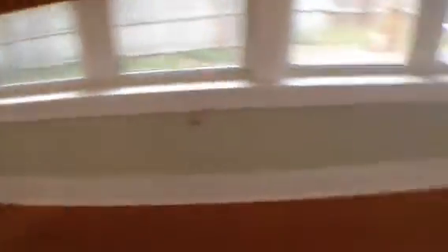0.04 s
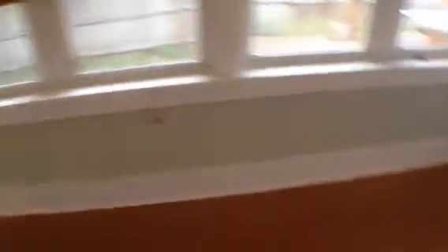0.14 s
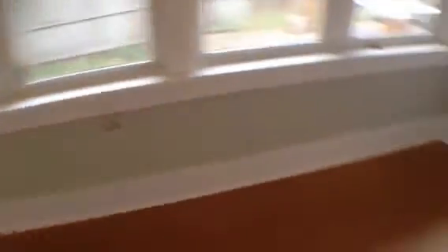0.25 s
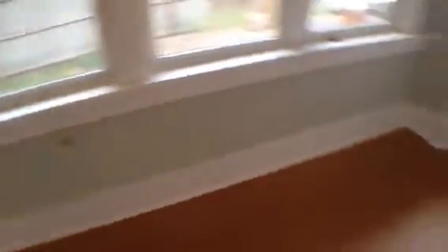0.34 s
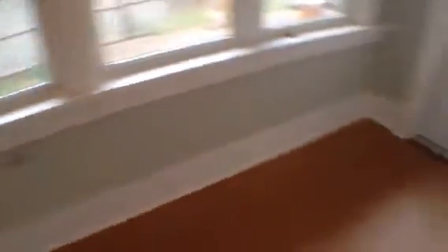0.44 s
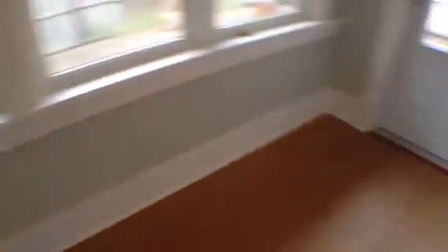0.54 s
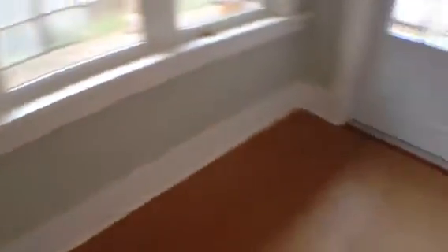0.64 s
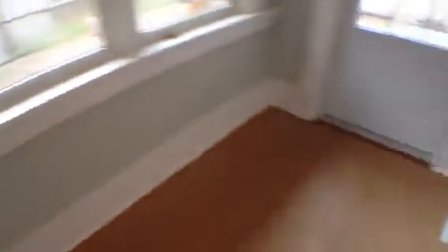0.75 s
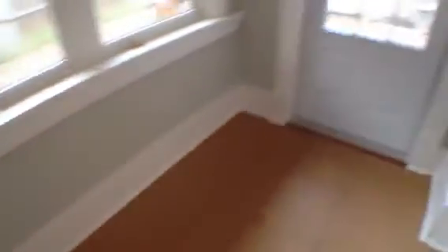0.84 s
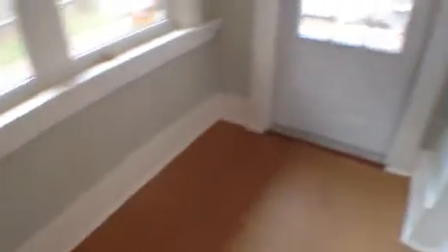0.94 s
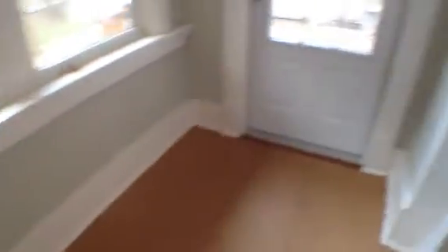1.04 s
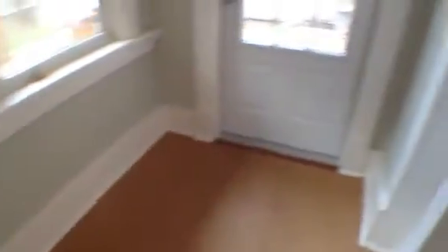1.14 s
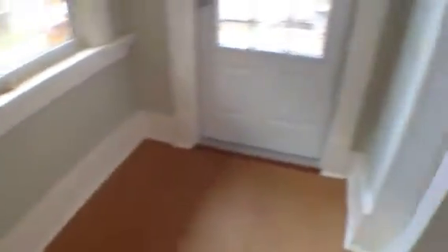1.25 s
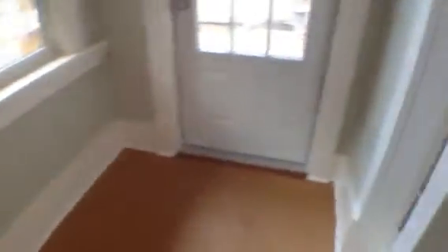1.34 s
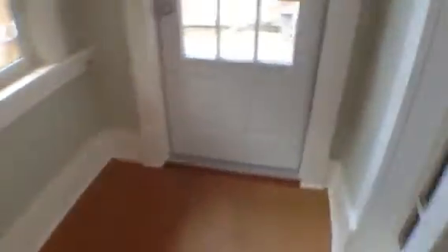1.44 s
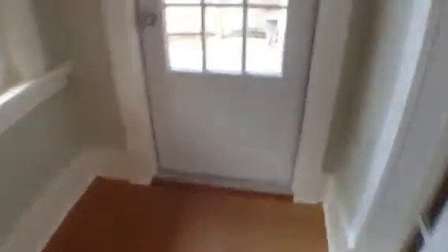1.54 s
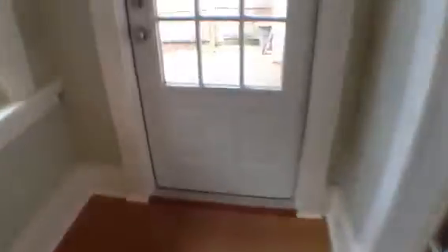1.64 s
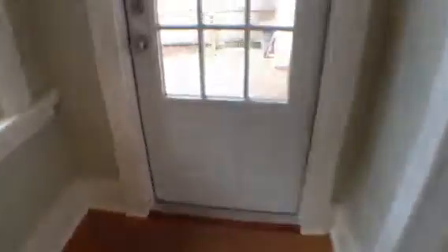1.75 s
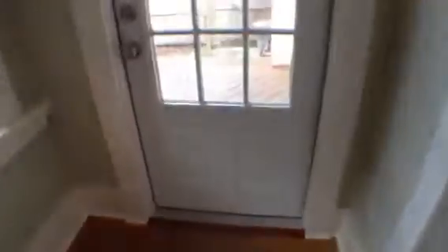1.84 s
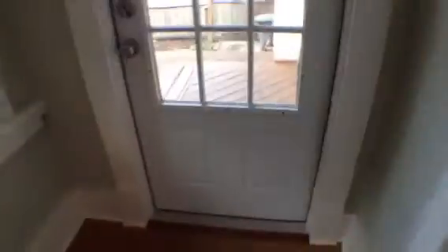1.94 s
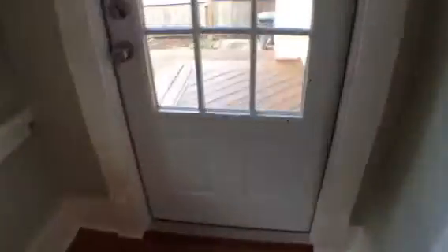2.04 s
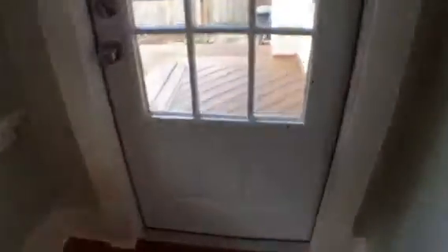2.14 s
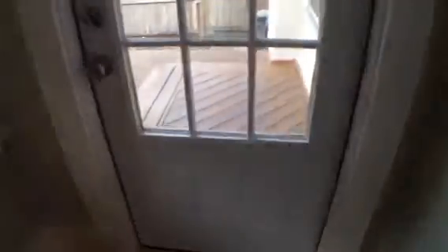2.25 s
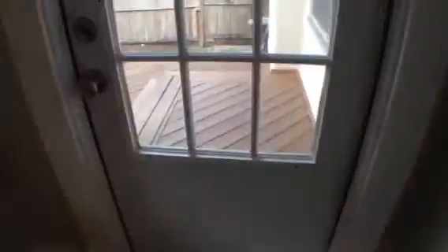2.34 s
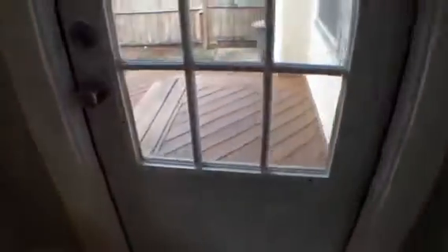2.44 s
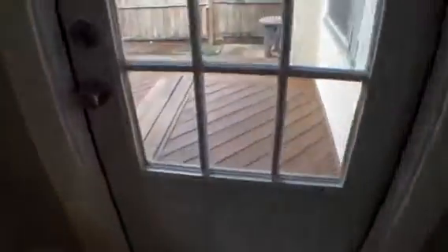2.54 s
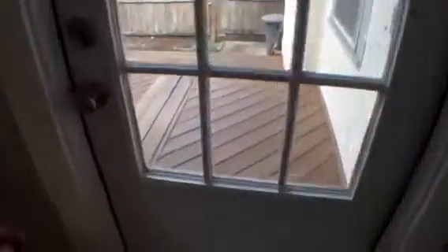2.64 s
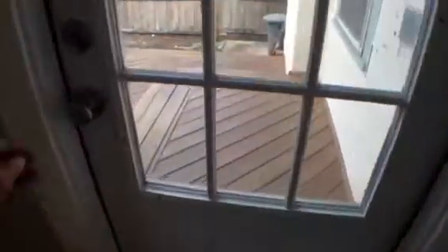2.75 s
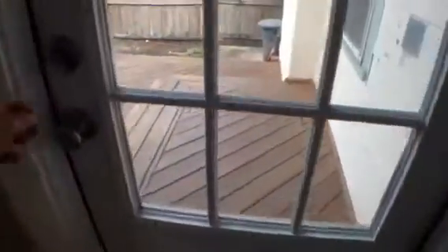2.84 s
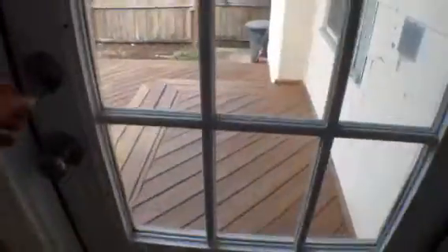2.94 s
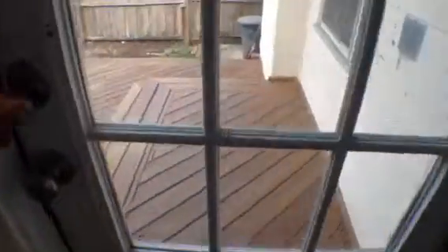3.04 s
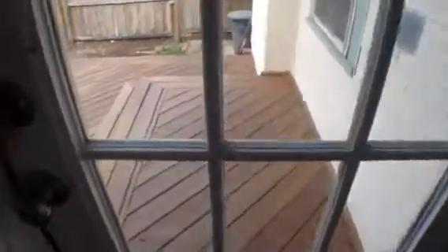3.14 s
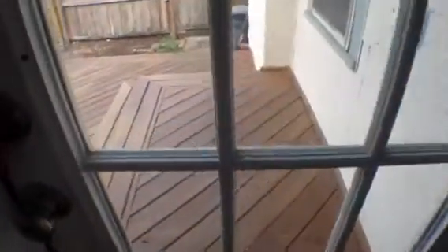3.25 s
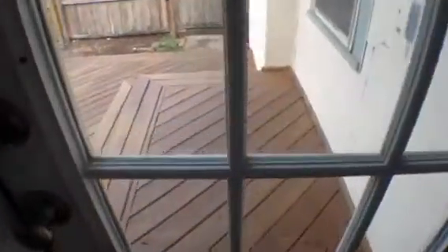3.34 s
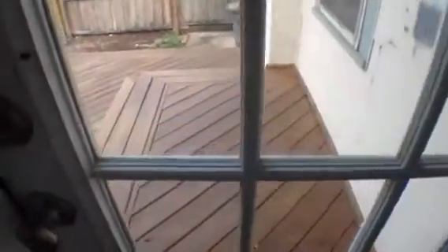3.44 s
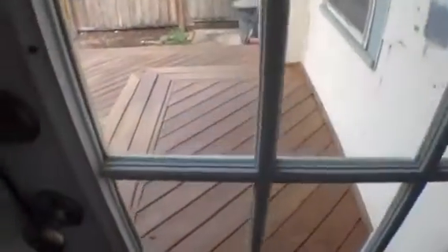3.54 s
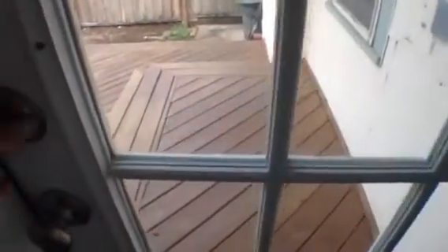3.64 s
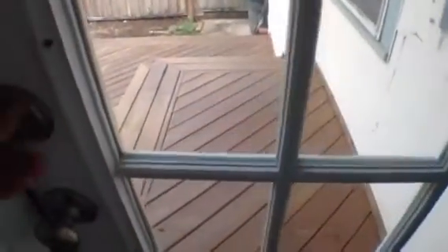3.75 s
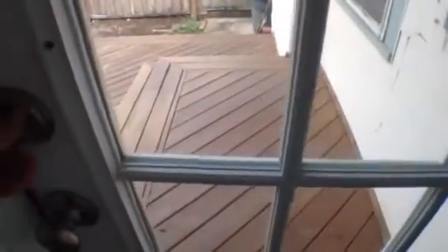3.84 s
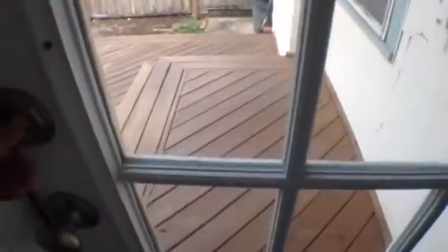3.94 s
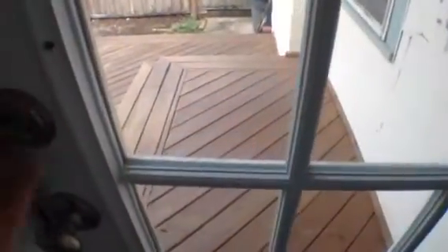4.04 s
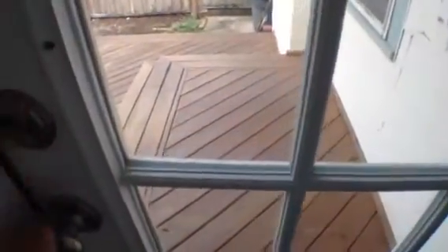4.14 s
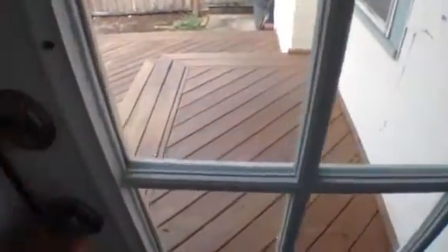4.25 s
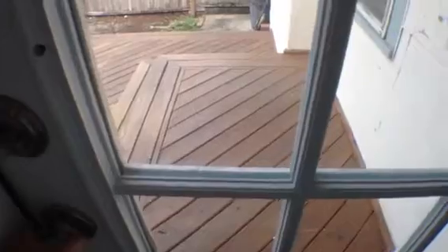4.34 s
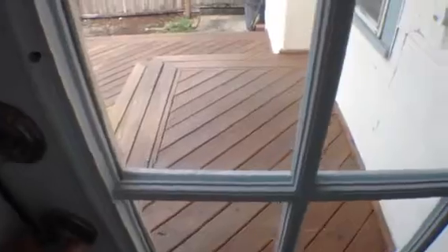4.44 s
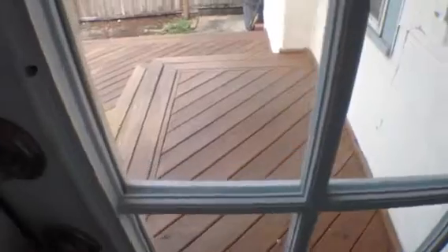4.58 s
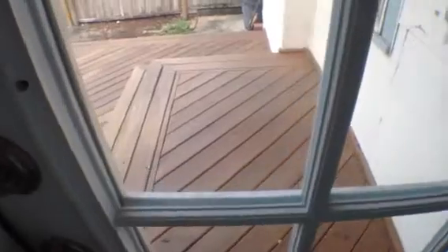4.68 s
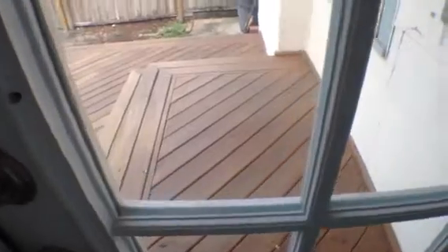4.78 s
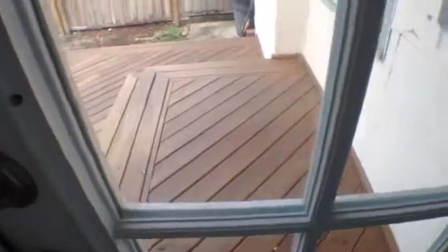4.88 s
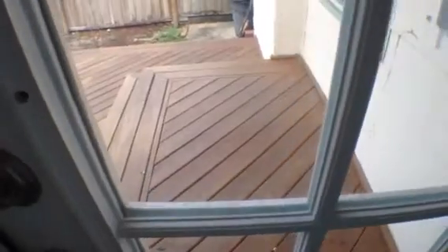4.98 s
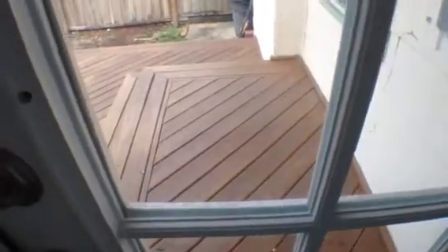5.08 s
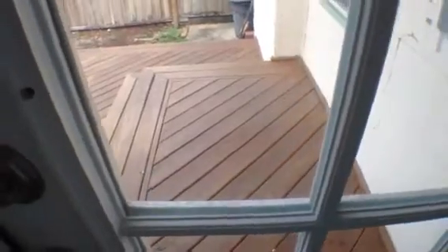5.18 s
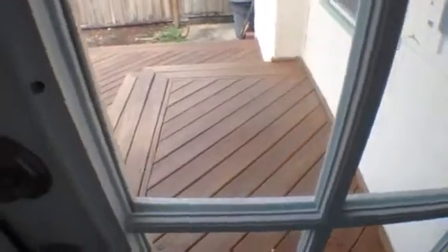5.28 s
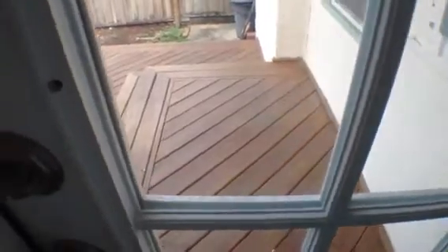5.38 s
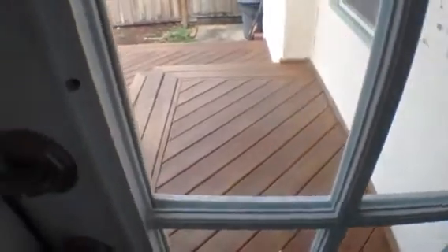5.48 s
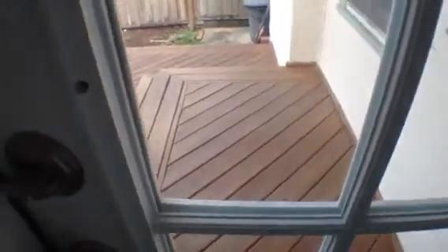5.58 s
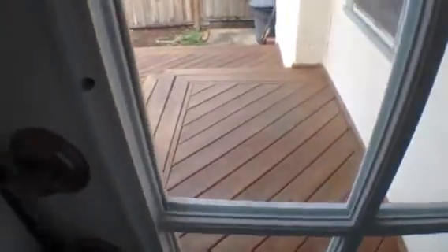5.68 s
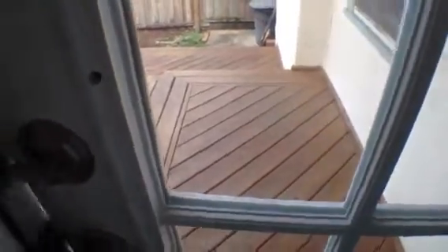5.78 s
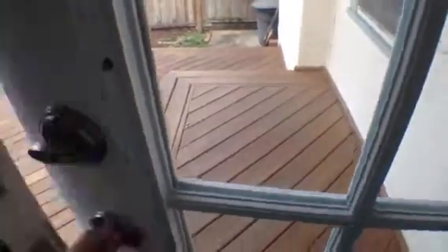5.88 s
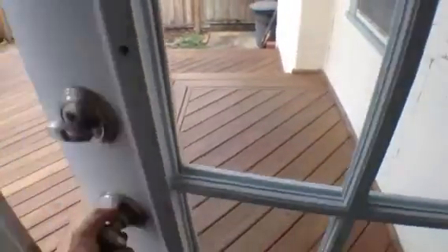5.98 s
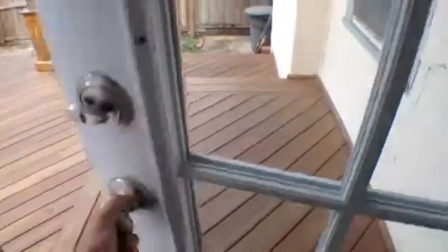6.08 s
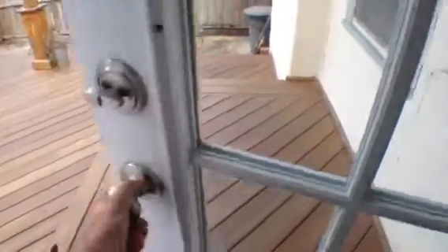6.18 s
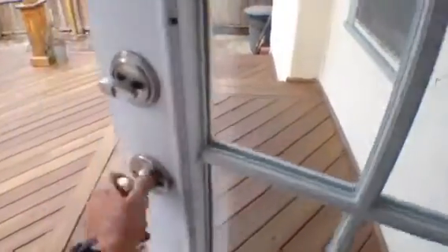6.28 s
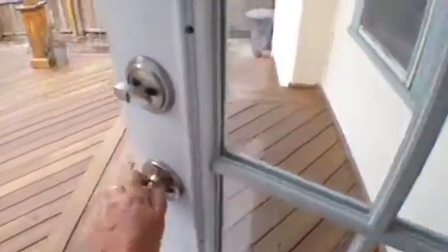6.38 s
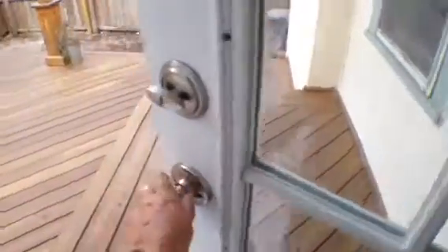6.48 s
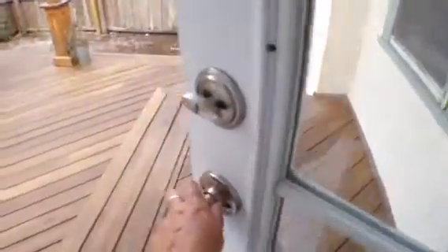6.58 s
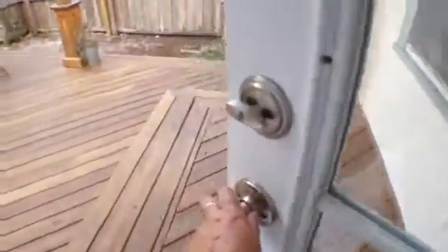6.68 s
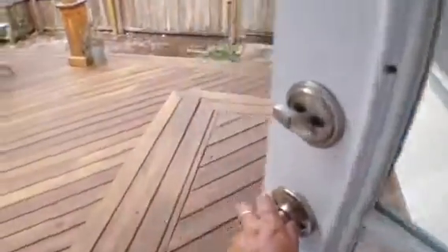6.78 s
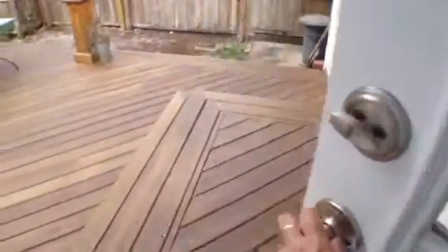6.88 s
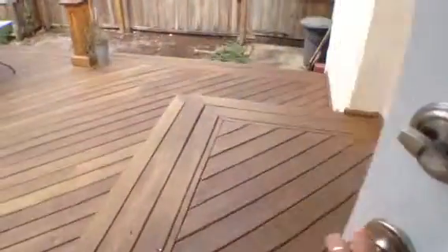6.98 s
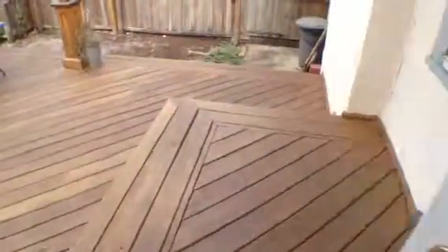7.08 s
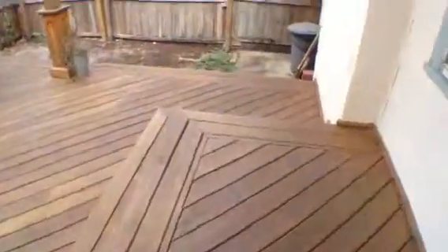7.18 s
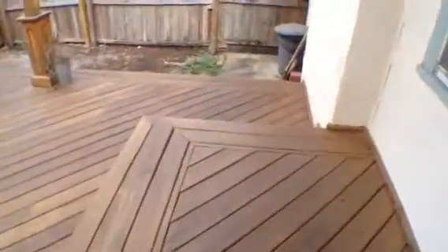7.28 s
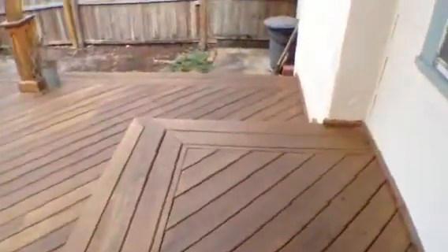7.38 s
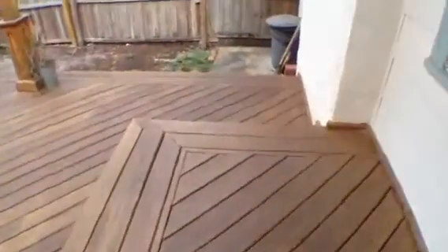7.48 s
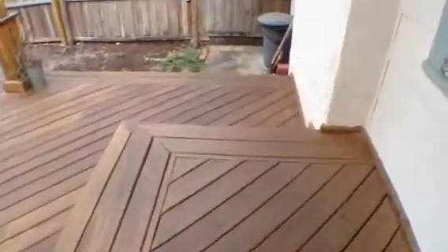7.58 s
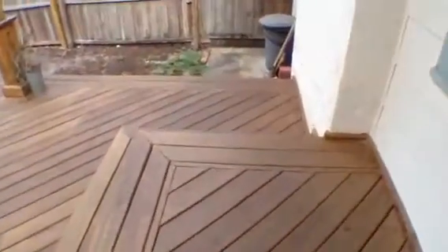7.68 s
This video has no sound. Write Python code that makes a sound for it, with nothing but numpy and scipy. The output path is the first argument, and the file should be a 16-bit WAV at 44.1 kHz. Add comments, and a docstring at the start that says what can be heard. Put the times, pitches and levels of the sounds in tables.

```python
"""In a bare sunroom, someone walks over a wooden floor, turns back a deadbolt, works the door knob
and pulls a glazed door open until it bumps its stop. Shoes rasp and knock on the boards. Each blow
in the lock rings its metal and the door, and sliding parts grind as they stick and slip. The hard
room echoes, and a steady background noise grows as the opening lets in the outdoor air."""
import sys
import numpy as np
from scipy import signal
from scipy.fft import rfft, irfft
from scipy.io import wavfile
from scipy.ndimage import uniform_filter1d

SR = 44100
rng = np.random.default_rng(int(sys.argv[2]) if len(sys.argv) > 2 else 0)


def waveform_to_disk(signal):
    """Save audio, clipped to [-1, 1], as 16-bit WAV at the path in sys.argv[1]."""
    frames = np.transpose(np.atleast_2d(signal))
    scaled = np.clip(frames, -1, 1) * 32767
    samples = np.round(scaled).astype(np.int16)
    wavfile.write(sys.argv[1], SR, samples)


N = 340452

# A "tilt" makes a sound brighter (above 0) or duller. "Contact" is how slowly a hit's chatter fades.
# Steps and scuffs: (time [s], sole level [dB], boards vs sole [dB], joists vs sole [dB],
# contact [s], sole tilt [dB/octave])
FOOTSTEPS = [(0.041, -51, -7, -11, 0.02, -1), (0.4193, -44, -8.5, -7, 0.026, 6),
             (0.5374, -45, -19, -17, 0.019, 0), (0.7997, -51.5, -14, -31, 0.055, 5),
             (0.8992, -39.5, -1.5, -7, 0.0071, 0.5), (1.459, -52, -2, 5.5, 0.048, -4.5),
             (1.6646, -48.5, -6.5, -25, 0.027, -3.5), (1.7569, -35.5, -13, -28, 0.0043, 6.5),
             (1.7744, -50, 6.5, 0, 0.0056, 14), (1.925, -45.5, -25, -9.5, 0.0078, 2),
             (2.1182, -58, 0, 4.5, 0.036, 1), (2.163, -46.5, -2.5, -29, 0.0097, 5),
             (2.246, -49, -3.5, -5, 0.013, -3), (2.3949, -37.5, 2.5, -1.5, 0.0046, -8),
             (2.4151, -56, 10, -13, 0.009, -31), (2.7722, -55.5, -17, 7, 0.013, 5),
             (2.8096, -31.5, -17.5, -36, 0.0067, 11), (7.5346, -42.5, -1.5, -11, 0.0046, -4),
             (7.5615, -53, -28, -12, 0.036, 10)]
# Metal parts and weather strip sliding: (start [s], end [s], grind at start [dB], grind at end [dB],
# hiss vs grind [dB], rumble vs grind [dB], rumble centre [Hz])
RUB_STROKES = [(3.062, 3.192, -61, -56, 3.1, -17, 300), (3.169, 3.267, -54.5, -63, 2, 8, 372),
               (3.24, 3.317, -54.5, -47, 0.5, -4.5, 338), (3.33, 3.472, -51, -60.5, -6, 1, 333),
               (3.511, 3.653, -44, -79, -8, .3, 400), (4.19, 4.237, -72, -70, 3, 16, 255),
               (4.285, 4.442, -54.5, -78.5, -20, 23.5, 169), (4.5, 4.65, -68, -68.5, -24, 17, 233),
               (5.06, 5.138, -79, -41.5, -11, 3, 263), (5.12, 5.298, -53.5, -78, -23, 11.5, 263),
               (5.5, 5.635, -53, -60, -9, 6, 273), (5.629, 5.669, -27.5, -44, -4.5, 7, 205.6),
               (5.66, 5.798, -45, -60, -12, 9.5, 220), (5.99, 6.095, -65, -54.5, -15, 7.5, 280),
               (6.12, 6.26, -57.5, -58.5, -0.5, 3.5, 250), (6.26, 6.344, -55, -49, -4, -6, 250),
               (6.38, 6.478, -50.5, -58.5, -6, -2.5, 300), (6.485, 6.643, -47.5, -72, -9, 1, 280),
               (7.128, 7.197, -53, -41, -6, 12, 203), (7.19, 7.283, -38.5, -70.5, 0, 10.5, 287),
               (7.202, 7.35, -57, -76, 4, 18, 284)]
# Blows in the lock: (time [s], case level [dB], small parts vs case [dB], stile vs case [dB],
# panel vs case [dB], contact [s], case tilt [dB/octave])
LOCK_BLOWS = [(3.2664, -58, 20, 7, -11, 0.0058, -2), (3.3095, -26.5, -14, -13.5, -32, 0.015, 4),
              (3.3272, -33.5, -11, 1, -10, 0.0037, 1.5), (3.478, -24, -4.5, -21.5, -36, 0.011, 5),
              (3.5034, -25, 1.5, -10.5, -15, 0.002, 10), (3.5658, -39, -14, -9, -8, 0.0053, 4),
              (3.6856, -44.5, -10, -19, -23, 0.0068, 4), (3.7993, -33.5, -10.5, -4.5, -3, 0.017, -0.5),
              (4.2452, -40.5, -0.5, -38, -10, 0.0095, 3), (4.2678, -41, -8, -4, -1.5, 0.021, 8),
              (4.2898, -31.5, 2, 1, -2, 0.0075, 7.5), (4.3196, -52, -15, 14, 6, 0.0031, -2),
              (4.3526, -60, -13, 8, 1, 0.0066, 4), (4.4895, -30.5, -1, -23, -9, 0.0034, 9.5),
              (4.5523, -38.5, -21, -3, -18, 0.005, 5), (4.5877, -36, -2, -7, -11, 0.0071, -1),
              (5.004, -34.5, 4.5, -24, -30, 0.0043, 6.5), (5.0591, -44.5, 0, -4, -5, 0.0059, 6),
              (5.1286, -35.5, -14, .5, -5, 0.0031, 11), (5.1395, -39.5, 2, -7, -6, 0.0017, -17),
              (5.2862, -46.5, -8, -11, 5, 0.012, 1), (5.302, -48.5, 2, 1.5, 7.5, 0.0037, 4),
              (5.4289, -38.5, -3.5, 7.5, 2.5, 0.0069, -10), (5.442, -36, -10, -2, -3, 0.022, -2),
              (5.4778, -22.5, -9.5, -8, -10, 0.0083, 4), (5.4903, -18.5, -24, -32, -11, 0.0076, -2),
              (5.6341, -22.5, 0.5, -9.5, 3, 0.0063, -2), (5.648, -17.5, -20, -5, -10, 0.0064, -5),
              (5.6643, -27, 6.5, -1, 9, 0.0019, -13), (6.0113, -53, 7, 1.3, 11, .0035, .3),
              (6.0613, -48.5, 5, 7, -12, 0.0018, 4), (6.098, -21.5, -5, -11.5, -17, 0.0055, 9),
              (6.2656, -28, -12, -15, -27, 0.0027, -2.3), (6.348, -28.5, -1.5, 4, -0.5, 0.0053, -3.5),
              (6.3738, -35.5, -3, 0, 0, 0.0042, -2), (6.447, -35, -19, -9, -14, 0.0028, 3.7),
              (6.4876, -32.5, -8, -9, -7.5, 0.007, -2), (7.0181, -52, -8, 12, 4, 0.015, .3),
              (7.057, -37, 2, -17, -16, 0.025, 5), (7.1249, -28.5, -15, 10.5, 2.5, 0.0056, -4),
              (7.142, -45.5, -9, 9, 23.5, .004, -5), (7.1738, -25, -3, -19, -3, 0.0042, -6.5),
              (7.1976, -22, -4, -19, -17, .0034, 0), (7.2109, -31.5, -9, -18, 10.5, .0022, 2)]
# Loose parts clicking on their own: (time [s], level [dB], tilt [dB/octave])
LOOSE_CLICKS = [(3.7653, -41.5, 9), (3.8484, -34, 17.5), (3.859, -37, 16), (4.1632, -37, 8),
                (4.6335, -29, 12), (4.6436, -34.5, 15), (4.951, -43, 12), (4.967, -46, 11),
                (5.085, -39, 6.3), (5.147, -29.5, 12), (5.2325, -38, 0), (5.3775, -29.5, 20),
                (5.7931, -37, -7), (6.198, -33, .3), (6.321, -34.5, -9)]
# Pings of the spindle, the rod through the knob: (time [s], level [dB])
SPINDLE_PINGS = [(3.477, -51), (4.2444, -44), (4.5885, -42), (5.4285, -55), (5.442, -53), (5.4771, -30),
                 (5.635, -32), (6.0602, -50)]

# Modes, the pitches at which each object rings: (pitch [Hz], width [Hz], level [dB])
SOLE_MODES = [(4500, 880, 7.5), (6700, 1700, -7), (7440, 3600, 9.5), (9500, 18000, 3.5), (11370, 1800, 3.5),
              (15140, 8100, -4)]
BOARD_MODES = [(1070, 550, -17.5), (1430, 1100, 1), (1730, 1300, 4), (2560, 330, 2.5), (3000, 830, -3.5)]
JOIST_MODES = [(260, 24, 1), (290, 85, 0), (362, 99, 5), (460, 200, 7), (580, 100, -1), (664, 280, 1),
               (810, 320, -15)]  # the beams under the floorboards
LOCK_CASE_MODES = [(1090, 280, -3), (1340, 280, 0), (1540, 280, 1), (1800, 320, 0), (2180, 350, 0),
                   (2600, 420, -3), (3050, 480, -4), (3550, 520, -5), (4150, 500, -5), (4715, 380, -4),
                   (5100, 400, -11)]
SMALL_PART_MODES = [(5900, 1000, -2), (6900, 900, 0), (7800, 1000, -1), (8800, 1100, -2), (10000, 900, 0),
                    (11200, 900, 0), (12500, 1300, -1), (14000, 1500, -1), (15200, 1200, -2)]
PANEL_MODES = [(130, 32, -14), (162, 54, -1), (191.3, 28, -0.5), (227, 75, 0), (297.3, 58, 1),
               (358, 33, -4), (372, 26, -3)]  # the whole swinging door
STILE_MODES = [(442, 41, -2), (528, 37, 0.5), (621, 120, -2), (648, 100, -5.5), (756, 70, -1),
               (884, 170, -9)]  # the door's upright edge, which holds the lock
SPINDLE_MODES = [(4700, 82, 0)]

# Tone of the background air and of the rubbing hiss: (frequency [Hz], level [dB])
AIR_SPECTRUM = [(18, -55), (30, -5), (58, 5), (74, -36), (92, -38), (118, -7), (242, -5), (331, -5.5),
                (529, -14), (939, -16), (1760, -21.5), (2880, -23), (5000, -26.5), (9000, -30.5),
                (15300, -31)]
HISS_SPECTRUM = [(3500, -22.5), (5500, 6), (8000, 5), (11000, 2.5), (15000, 3)]
# How long the room echoes: (frequency [Hz], time to fade by 60 dB [s])
ECHO_TIMES = [(120, 0.6), (330, 0.46), (870, 0.64), (2300, 0.6), (6060, 0.44)]


def gain_of(db):
    return 10 ** (np.asarray(db) / 20)


def unit_rms(x):
    return x / np.sqrt(np.mean(x ** 2) + 1e-20)


def value_at(points, hz):
    f, value = np.transpose(points)
    return np.interp(np.log(hz + 1), np.log(f + 1), value)


def add(mix, start_s, sound):
    part = mix[round(start_s * SR):][:len(sound)]
    part += sound[:len(part)]


def coloured(x, spectrum):
    """Filters x by a spectrum and sets its average strength (rms) to 1."""
    gains = gain_of(value_at(spectrum, np.fft.rfftfreq(len(x), 1 / SR)))
    return unit_rms(irfft(rfft(x) * gains, len(x)))


def chatter(contact_s):
    """The force of one hit: a sharp first touch, then tiny bounces that die away."""
    t = np.arange(8192) / SR
    contact_s = np.clip(contact_s, .0005, .04)
    bounces = np.exp(-t / contact_s) * (1 - np.exp(-t / (0.034 * contact_s)))
    touch = 2.6 * np.exp(-t / 0.0002)
    size = (bounces + touch) * abs(rng.standard_normal(len(t)))
    force = size * rng.choice([-1., 1.], len(t))
    for _ in range(4):  # choose the signs so that no pitch stands out
        spectrum = rfft(force)
        force = size * np.sign(irfft(spectrum / abs(spectrum)))
    return np.pad(force, (0, 4096))


def ring(force, modes, rise_s, tilt_db=0.):
    """An object rings at its modes, a little differently depending on where the force lands."""
    hz, width, db = np.transpose(modes)[:, :, None]
    luck = rng.standard_normal((len(modes), 2))
    share_db = db + tilt_db * np.log2(hz / np.median(hz)) + 1.5 * luck[:, :1]
    hz = hz * (1 + .015 * luck[:, 1:])
    f = np.fft.rfftfreq(8192, 1 / SR) + 1
    distance = (f ** 2 - hz ** 2) / (f * width)
    power = (gain_of(share_db) ** 2 / (1 + distance ** 2) ** 1.6).sum(0)
    cepstrum = irfft(np.log(power + 1e-9 * power.max()) / 2)
    cepstrum[1:4096] *= 2  # this fold puts all the ringing after the hit
    cepstrum[4097:] = 0
    ringing = irfft(np.exp(rfft(cepstrum)))[:4096]
    fade_in = 1 - np.exp(-(np.arange(4096) + 1) / SR / rise_s)
    return signal.fftconvolve(force, ringing * fade_in)[:len(force)]


def strike(contact_s, objects):
    """One hit rings several objects, each (modes, peak level [dB], rise [s], tilt [dB/octave])."""
    force, out = chatter(contact_s), 0
    for modes, db, rise_s, tilt_db in objects:
        sound = ring(force, modes, rise_s, tilt_db)
        out = out + gain_of(db) * sound / abs(sound).max()
    return out


def background_air():
    """House rumble and hiss drift in patches, growing louder and brighter as the door opens."""
    frames, hz = N // 256 + 5, np.fft.rfftfreq(1024, 1 / SR)
    real, imag, patches = rng.standard_normal((frames, 513, 3)).T
    drift_db = 1.2 * unit_rms(uniform_filter1d(uniform_filter1d(patches, 10, 0), 12, 1))
    t, opening_s = np.arange(frames) * 256 / SR, (5.7, 6.4)
    level_db = np.interp(t, opening_s, (-59.5, -54))
    hiss_db = np.interp(t, opening_s, (0, 3.4))
    treble_share = np.clip(np.log2((hz + 1) / 900) / 2.36, 0, 1)[:, None]
    colour = gain_of(value_at(AIR_SPECTRUM, hz))[:, None]
    colour /= np.linalg.norm(colour[(hz > 100) & (hz < 1000)])
    bands = (real + 1j * imag) * colour * gain_of(level_db + treble_share * hiss_db + drift_db)
    noise = signal.istft(bands, nperseg=1024, noverlap=768)[1][:N]
    bass_dip = signal.butter(3, [66., 98.], "band", fs=SR, output="sos")
    return noise - 0.92 * signal.sosfiltfilt(bass_dip, noise)


def footsteps():
    """Soles rasp and slap; a shorter hit knocks the boards and thuds in the beams below."""
    out = np.zeros(N)
    for s, db, board_db, joist_db, contact_s, tilt_db in FOOTSTEPS:
        add(out, s, strike(contact_s, [(SOLE_MODES, db, .00005, tilt_db)]))
        floor = [(BOARD_MODES, db + board_db, .0002, 0), (JOIST_MODES, db + joist_db, .001, 0)]
        add(out, s, strike(0.25 * contact_s, floor))
    return out


def room_echo(sound):
    """Hard walls send back echoes, each pitch range fading at its own speed; three tails take turns."""
    out = np.zeros(N)
    for k in range(3):
        echoes = np.zeros(SR)
        slots = np.arange(180, SR - 20, 20)
        echoes[slots + rng.integers(0, 20, len(slots))] = rng.choice([-1., 1.], len(slots))
        hz, t, bands = signal.stft(echoes, SR, nperseg=256)
        fade = gain_of(-60 * t / value_at(ECHO_TIMES, hz)[:, None])
        tail = signal.istft(bands * fade, SR, nperseg=256)[1]
        turn = np.sqrt(2 / 3) * np.cos(np.pi * (np.arange(N) / SR * 3.1 + k / 3))
        out += signal.fftconvolve(sound * turn, tail / np.linalg.norm(tail))[:N]
    return out


def rubbing():
    """Sliding parts stick and slip: the uneven jerks grind in the lock, hiss and shake the door."""
    out = np.zeros(N)
    for start, end, start_db, end_db, hiss_db, rumble_db, hz in RUB_STROKES:
        n = len(np.arange(start, end, 1 / SR))
        jerks = gain_of(2.1 * unit_rms(uniform_filter1d(rng.standard_normal(n), 150)))
        on_lock, on_surface, on_door = jerks * rng.standard_normal((3, n))
        grind = unit_rms(ring(on_lock, LOCK_CASE_MODES, rise_s=0.000067))
        hiss = coloured(on_surface, HISS_SPECTRUM)
        door = ring(on_door, PANEL_MODES + STILE_MODES, rise_s=0.00033)
        rumble = coloured(door, [(hz / 4, -26), (hz, 0), (hz * 4, -26)])  # -13 dB per octave each way
        mix = grind + gain_of(hiss_db) * hiss + gain_of(rumble_db) * rumble
        loudness = gain_of(np.linspace(start_db, end_db, n)) * signal.windows.tukey(n, .2)
        add(out, start, loudness * mix)
    return out


def lock_knocks():
    """Bolt, knob and latch hit their stops and shake the door; loose parts click in between."""
    out = np.zeros(N)
    for s, db, parts_db, stile_db, panel_db, contact_s, tilt_db in LOCK_BLOWS:
        metal = [(SMALL_PART_MODES, db + parts_db, .00003, -3.7), (LOCK_CASE_MODES, db, .00013, tilt_db)]
        wood = [(STILE_MODES, db + stile_db, .0005, 0), (PANEL_MODES, db + panel_db, .002, 0)]
        add(out, s, strike(contact_s, metal + wood))
    for s, db, tilt_db in LOOSE_CLICKS:
        metal = [(SMALL_PART_MODES, db, .00003, tilt_db), (LOCK_CASE_MODES, db - 37, .00013, 0)]
        add(out, s, strike(contact_s=.0035, objects=metal))
    return out


def spindle_pings():
    """The rod through the knob rings briefly at one high pitch, close to the microphone."""
    out = np.zeros(N)
    for s, db in SPINDLE_PINGS:
        add(out, s, strike(contact_s=.0033, objects=[(SPINDLE_MODES, db, .0003, 0)]))
    return out


def air_thump():
    """The door leaves its frame and pumps the room's air into one low, fading hum."""
    start_s, pitch_hz, fade_s = 5.64, 56, .42
    t, out = np.arange(SR // 2) / SR, np.zeros(N)
    loudness = gain_of(-31 - 60 * t / fade_s) * (1 - np.exp(-t / 0.014))
    add(out, start_s, loudness * np.sin(2 * np.pi * pitch_hz * t))
    return out


def scene():
    """Mixes the feet and the door with their echo and the sounds of the air."""
    # cut the deep bass from the steps and door sounds
    bass_cut = signal.butter(3, 129, "high", fs=SR, output="sos")
    feet, door = signal.sosfilt(bass_cut, [footsteps(), lock_knocks() + rubbing()])
    spindle = spindle_pings()
    doorway_db = np.interp(np.arange(N) / SR, [5.9, 6.6], [0., -4.])  # less echo in the open doorway
    echo = room_echo(gain_of(8) * feet + gain_of(-4.5 + doorway_db) * door + gain_of(-23) * spindle)
    return (feet + door + spindle + echo + air_thump() + background_air())[None]


def record(dry):
    """The microphone drops the deep bass and the very highest treble."""
    bass_cut = signal.butter(4, 104., "high", fs=SR, output="sos")
    treble_cut = signal.firwin(511, 15350, window=("kaiser", 9), fs=SR)
    return signal.oaconvolve(signal.sosfilt(bass_cut, dry), treble_cut[None], "same")


dry = scene()
out = record(dry)
waveform_to_disk(out)
```